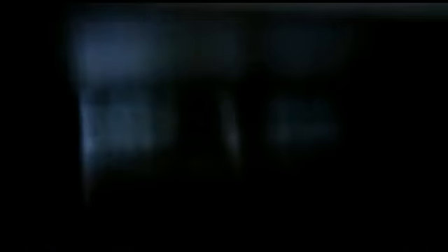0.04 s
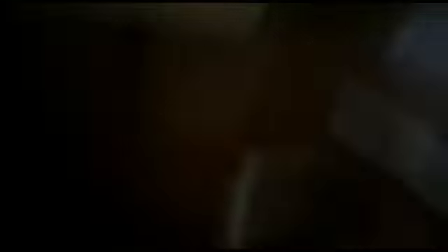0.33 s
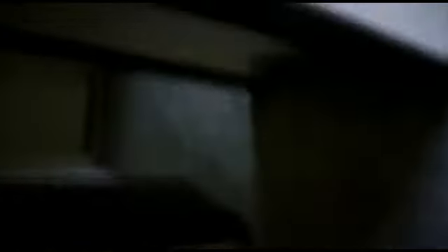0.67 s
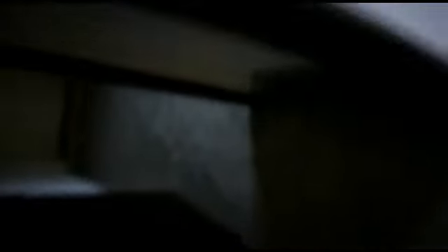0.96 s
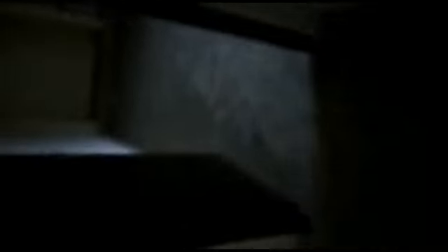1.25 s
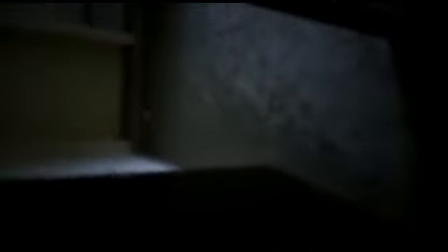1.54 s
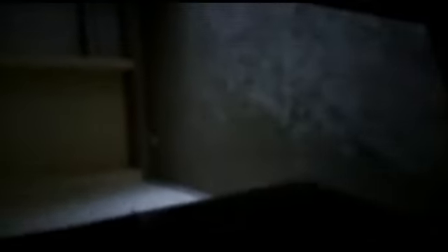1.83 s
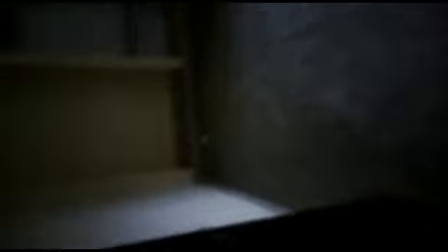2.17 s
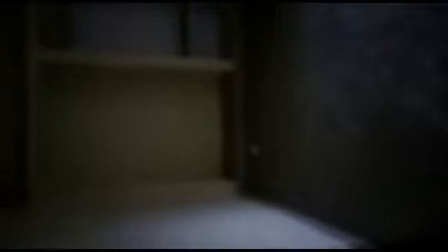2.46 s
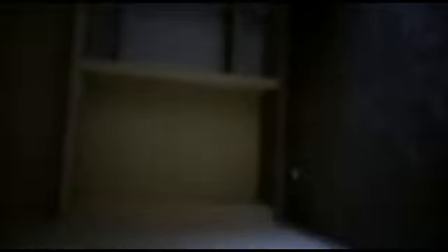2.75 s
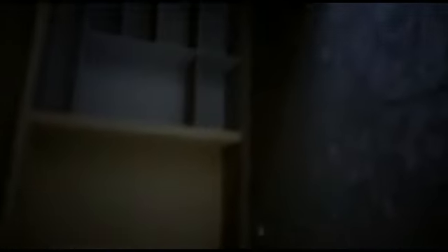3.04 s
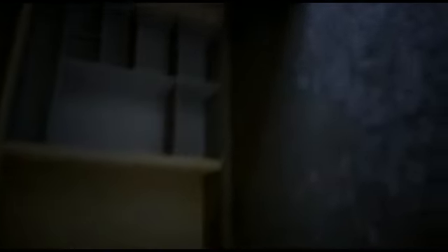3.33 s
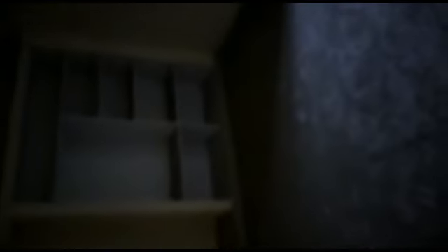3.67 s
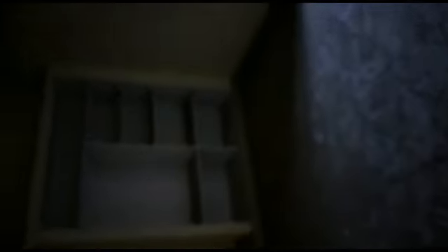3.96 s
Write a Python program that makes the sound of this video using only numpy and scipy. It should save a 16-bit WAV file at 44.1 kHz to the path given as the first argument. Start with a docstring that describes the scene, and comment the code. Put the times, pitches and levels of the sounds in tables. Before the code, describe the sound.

Wooden knocks ring out twice, far from the microphone, in a big bare room that is still booming from an earlier thud. The second knock is louder and hollower. Slow, swishing steps and small ticks sit over a low rumble and faint hiss.

```python
"""A large bare room booms with the tail of a heavy thud; then two distant knocks on wood echo through it,
the second heavier, duller and led by a soft bump. Each hit is a short crack and snap, followed by a wash
of reflections and ringing tones. Slow steps scuff and swish in the room, each trailing off in its echo,
with a tick now and then, over a steady bed of rumble and hiss."""
import sys
import numpy as np
from scipy import signal
from scipy.fft import rfft, irfft, next_fast_len
from scipy.io import wavfile
from scipy.ndimage import uniform_filter1d, map_coordinates

SR = 44100
rng = np.random.default_rng(int(sys.argv[2]) if len(sys.argv) > 2 else 0)


def inscribe(sig):
    """Save sig as 16-bit PCM at rate SR to the path in sys.argv[1].

    A 1-D sig is mono; a 2-D sig holds one channel per row.
    Samples are clipped to [-1, 1] before scaling.
    """
    pcm = np.round(np.clip(np.atleast_2d(sig).T, -1, 1) * 32767)
    wavfile.write(sys.argv[1], SR, pcm.astype(np.int16))


N = 176400

# stereo width of the room: f/Hz, side over mid/dB
STEREO_WIDTH = [(60, -24), (140, -18.5), (380, -7.5), (700, -2.5), (1150, 2), (2400, -0.5), (12000, 0)]


def knocks(crack_t60_s=0.021, push_hz=38.8):
    """Wood is touched, then cracks and snaps with a low push; a wall slaps back and the room answers."""
    # t/s, echo/dB, echo cutoff/Hz, hollow share/0-1, ring/dB, snap/dB, snap pitch/Hz, crack/dB,
    # push/dB, wall delay/s
    hits = [(1.5111, -38, 4400, 0.3, -17, -25, 1200, -32.5, -70, .018),
            (3.179, -55.5, 440, 0.7, -32.5, -76, 400, -71, -77, .02),
            (3.2746, -25, 3480, 0.99, -2, -19, 880, -27.5, -50, 0.032)]
    # strongest tones in the echo: f/Hz, relative level/dB, t60/s
    modes = [(152, -48.5, 8.1), (264, -38, 2.6), (324.4, -31, 1.45), (346, -36, 1.65), (370, -37.5, 4.6),
             (398, -32.5, 3.3), (553.3, -33, 2.3), (633.4, -35, 1.2), (656, -30, 1.54), (871, -29.5, 1.45),
             (935, -31, 2.33), (946, -44, 2.5), (1035, -38, 2.6), (1206, -39, 0.5)]
    # colours of hard wood, hollow wood and the contact itself: f/Hz, relative level/dB
    hard_wood = [(30, -33), (150, -10), (260, -11.5), (310, 10), (360, -9.5), (460, -2), (560, -4),
                 (740, -1), (860, 2), (1000, -19), (1130, 8.5), (1280, 4), (1400, -3), (1550, 3),
                 (1850, -9.5), (2250, -3), (2550, -21), (3900, -12), (5200, -22.5), (9000, -9)]
    hollow_wood = [(30, -43), (110, -21), (170, -15), (225, -1.5), (280, -8.5), (315, 3), (345, 2),
                   (390, 3.5), (465, -8.5), (570, 1.5), (650, 2.5), (740, -7), (930, 6.5), (1110, -6.5),
                   (1260, -5), (1370, -11.5), (1470, -8), (2000, -18), (3200, -22.5), (4500, -38.5),
                   (9000, -50)]
    crack_colour = [(100, 4), (500, 8.5), (1400, 1), (2500, 0), (3300, -3.5), (4300, -20), (5500, -34),
                    (9000, -42)]
    out = np.zeros((2, N))
    for start, echo_db, cutoff_hz, hollow, ring_db, snap_db, snap_hz, crack_db, push_db, wall_s in hits:
        t = np.maximum(clock() - start, 0)
        wood = lambda hz: amp(hollow * along(hollow_wood, hz) + (1 - hollow) * along(hard_wood, hz))
        tail = amp(echo_db) * echo(lambda hz: wood(hz) * lowpass(hz, cutoff_hz), start)
        tail *= 1 + amp(-5.5) * fade(t, t60=0.25)  # first reflections stand above the tail
        tail += amp(ring_db) * ringing(modes, start)
        tail *= amp(1.5 * wobble(per_s=220) * fade(t, t60=1.1))  # reflections come in lumps, then merge
        tail *= 1 - np.exp(-t / 0.00088)  # soften the echo's onset
        since_blow = t - 0.002  # the full blow lands just after the first touch
        touch = amp(-4.5) * burst(t, crack_t60_s)
        blow = burst(since_blow, crack_t60_s)
        slapback = amp(-13.5) * burst(t - wall_s, crack_t60_s)
        crack = amp(crack_db) * rush(crack_colour) * (touch + blow + slapback)
        snap_shape = (since_blow > 0) * fade(since_blow - 0.002, t60=0.016)  # brief hold, fast decay
        snap = amp(snap_db) * np.sin(2 * np.pi * snap_hz * since_blow) * snap_shape
        push = amp(push_db) * np.sin(2 * np.pi * push_hz * t) * burst(t, t60=0.14)
        out += tail + crack + snap + push
    return out


def boom(level_db=-31.5):
    """The low tail of a heavy thud, already dying away, and the room modes it leaves ringing."""
    # colour of the tail: f/Hz, relative level/dB
    colour = [(25, -52), (42, -26), (60, -23), (92, -8.5), (106, -23), (122, -0.5), (160, -3.5), (182, -7),
              (215, -6.5), (290, -16.5), (350, -12.5), (430, -14.5), (465, -20), (505, -16.5), (660, -22.5),
              (1900, -27.5), (3000, -35), (6000, -78)]
    # room modes: f/Hz, level/dB, t60/s
    modes = [(60.3, -44, 4.1), (82.6, -43.5, 3.9), (91.25, -43.5, 6.5), (126.8, -42, 8.7),
             (135.1, -41.5, 3.8), (240.5, -45.5, 3.7), (289.5, -45, 3.4), (496, -48, 3.8)]
    tail = amp(level_db) * echo(lambda hz: amp(along(colour, hz)), start=0, t60_share=0.8)
    return tail + ringing(modes, start=0)


def footsteps(body_lift_db=1.5, tick_width_s=0.0024):
    """Slow steps scuff and swish in the room, each trailing off in its echo; small ticks linger too."""
    # t/s, level/dB, rise/s, t60/s, body over fizz before the lift/dB
    scuffs = [(.08, -42, 0.11, 0.83, -5), (.235, -58, 0.045, 1.27, 5.5), (.65, -56, 0.068, 2.7, -2.5),
              (.84, -54.5, 0.12, 0.73, -3.5), (.99, -55.5, 0.085, 0.61, -38),
              (1.215, -46.5, 0.047, 1.22, -7.5), (1.665, -59.5, 0.037, 1.27, -5),
              (1.895, -44, 0.0096, 0.27, -15), (1.933, -45, 0.04, 0.48, -1), (2.1, -56, 0.25, 1.4, 4),
              (2.51, -60, 0.11, 1.5, -5), (2.625, -52, 0.054, 2.7, 1.5), (2.99, -57, 0.033, 0.97, -8),
              (3.31, -63, .06, 1.3, -8), (3.96, -61.5, 0.056, 1.3, -15)]
    # t/s, level/dB, body over fizz/dB
    ticks = [(.227, -48, -18), (1.926, -46, 7), (3.662, -43, 0.5)]
    # a scuff's bright fizz and its midrange body: f/Hz, relative level/dB
    fizz_colour = [(800, -24), (2500, 0), (4500, 4), (5700, -9.5), (6500, 1), (7400, -7), (9000, 4.5),
                   (10300, 3), (11400, -1.5), (12100, 2.5), (15600, -8.5)]
    body_colour = [(200, -37), (700, -0.5), (2300, 3.5), (4300, -2), (6000, -6.5), (12000, -20)]
    fizz_power, body_power = np.zeros(N), np.zeros(N)
    for start, db, rise, t60, body_db in scuffs:
        t = clock() - start
        swell = amp(db) * np.clip(1 + t / rise, 0, 1) * fade(t, t60)
        fizz_power += swell ** 2
        body_power += (amp(body_db + body_lift_db) * swell) ** 2
    for start, db, body_db in ticks:
        t = clock() - start
        click = amp(db) * np.exp(-np.abs(t) / tick_width_s)
        tail = amp(db - 12.5) * burst(t, t60=1)
        fizz_power += click ** 2 + tail ** 2
        body_power += (amp(body_db) * click) ** 2
    grain = amp(0.5 * wobble(per_s=260))
    fizz = np.sqrt(fizz_power) * patchy_flutter(rush(fizz_colour))
    body = np.sqrt(body_power) * patchy_flutter(rush(body_colour))
    return grain * (fizz + body)


def patchy_flutter(hiss, depth_db=3):
    """The hiss flickers in random patches of time and pitch."""
    spectra = signal.stft(hiss, nperseg=256)[2]
    patches = uniform_filter1d(rng.standard_normal(spectra.shape[1:]), 5, axis=0)
    patches = uniform_filter1d(patches, 9, axis=1)
    return unit(signal.istft(spectra * amp(depth_db * unit(patches)), nperseg=256)[1][:, :N])


def echo(colour, start, t60_share=1):
    """A wash of dense reflections, steady until start; then the treble dies sooner than the bass."""
    # the room's reverb time: f/Hz, t60/s
    reverb_time = [(60, 4.3), (150, 4.6), (300, 3.8), (600, 3.4), (1000, 2.8), (2000, 2.26), (4000, 1.6),
                   (10000, 1.6)]
    hz, t, spectra = signal.stft(diffuse(colour), SR, nperseg=1024)
    decay = fade(t - start, t60_share * along(reverb_time, hz)[:, None])
    return signal.istft(spectra * decay, SR, nperseg=1024)[1][:, :N]


def ringing(modes, start, waver_rad=0.99):
    """Slightly wavering tones that decay from start; the higher ones reach the two ears out of step."""
    t, out = clock() - start, np.zeros((2, N))
    for hz, db, t60 in modes:
        phase = 2 * np.pi * (hz * t + rng.random()) + waver_rad * wobble(per_s=8)
        ear_offset = spread(hz) * np.array([[1], [-1]])
        out += amp(db) * fade(t, t60) * np.sin(phase + ear_offset)
    return out


def room_tone(rumble_db=-51, hiss_db=-68):
    """The bed: the building's steady rumble and a faint hiss."""
    # colours of the two layers: f/Hz, relative level/dB
    rumble_colour = [(25, -28), (50, -15), (85, -10.5), (105, -17), (125, 0.5), (158, 4), (182, -9),
                     (198, -0.5), (220, -8), (290, -5), (400, -8), (450, -10), (850, -12.5), (1300, -13.5),
                     (1650, -17), (3000, -17.5), (5000, -22), (15000, -46)]
    hiss_colour = [(1000, -8.5), (3500, 0.5), (5500, -12), (7500, -14), (9500, -6.5), (15000, -17)]
    rumble = diffuse(lambda hz: amp(along(rumble_colour, hz)) * lowpass(hz, cutoff_hz=2500))
    return amp(rumble_db) * rumble + amp(hiss_db) * rush(hiss_colour)


def diffuse(colour):
    """Coloured stereo noise of rms 1 from all around: bass near mono, treble wide."""
    white = rng.standard_normal((2, N))
    mid, side = filtered(white, lambda hz: colour(hz) * [np.cos(spread(hz)), np.sin(spread(hz))])
    return unit(np.array([mid + side, mid - side]))


def rush(spectrum):
    """Diffuse noise coloured by a table of f/Hz, level/dB."""
    return diffuse(lambda hz: amp(along(spectrum, hz)))


def spread(hz):
    """Angle from mid towards side, in radians."""
    return np.arctan(amp(along(STEREO_WIDTH, hz)))


def filtered(x, response):
    """EQ x with a gain curve over frequency."""
    size = next_fast_len(N + SR // 2)
    return irfft(rfft(x, size) * response(np.fft.rfftfreq(size, 1 / SR)), size)[..., :N]


def lowpass(hz, cutoff_hz):
    """Gain of a 12 dB per octave roll-off."""
    return 1 / np.sqrt(1 + (hz / cutoff_hz) ** 4)


def along(points, hz):
    """Read a curve of f/Hz, value on a log frequency axis."""
    freqs, values = np.transpose(points)
    return np.interp(np.log(hz + 1), np.log(freqs + 1), values)


def burst(t, t60, attack_s=0.00015):
    """A sharp attack at t = 0 and an exponential decay."""
    return (1 - np.exp(-np.maximum(t, 0) / attack_s)) * fade(t, t60)


def fade(t, t60):
    """Full level until t = 0, then down 60 dB every t60 seconds."""
    return amp(-60 * np.maximum(t, 0) / t60)


def wobble(per_s):
    """A smooth random curve with per_s knots a second."""
    return map_coordinates(rng.standard_normal(int(N * per_s / SR) + 4), [clock() * per_s])


def clock():
    return np.arange(N) / SR


def amp(db):
    return 10 ** (np.asarray(db) / 20)


def unit(x):
    return x / np.sqrt(np.mean(x ** 2) + 1e-20)


def scene():
    """The mix, with the knocks a touch to the right."""
    return boom() + knocks() * amp([[-0.5], [0.5]]) + footsteps() + room_tone()


def record(dry):
    """A brick-wall cut takes off the very top."""
    return filtered(dry, lambda hz: hz < 15750)


dry = scene()
out = record(dry)
inscribe(out)
```